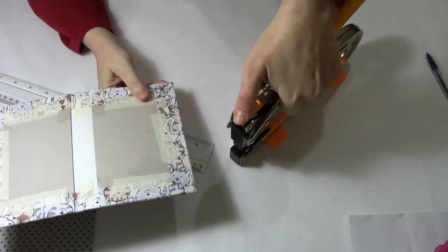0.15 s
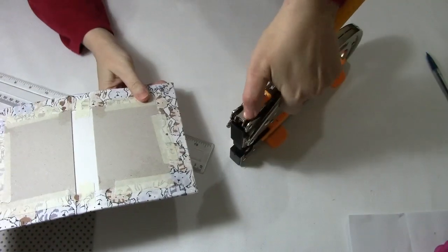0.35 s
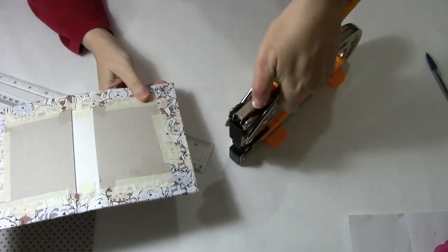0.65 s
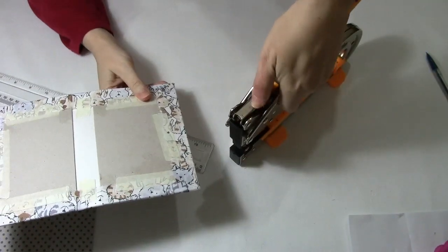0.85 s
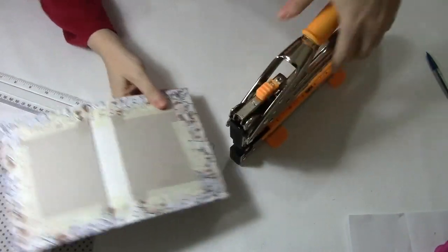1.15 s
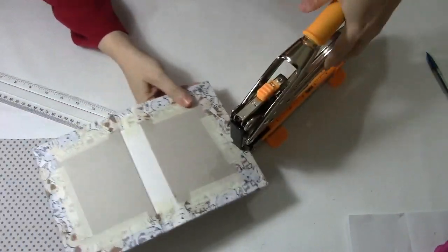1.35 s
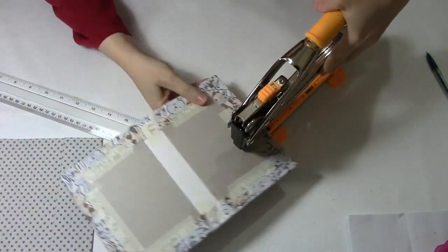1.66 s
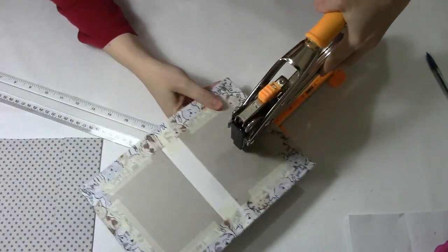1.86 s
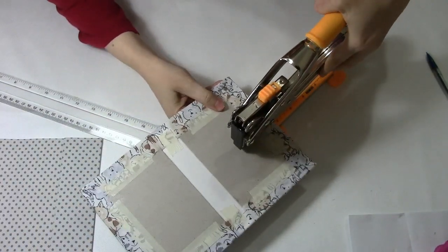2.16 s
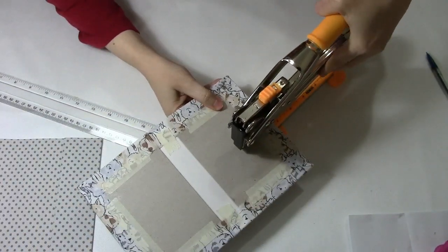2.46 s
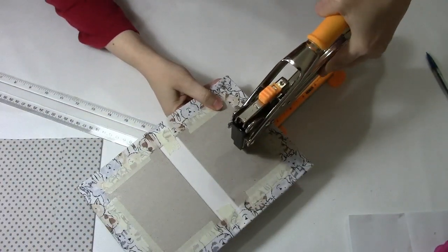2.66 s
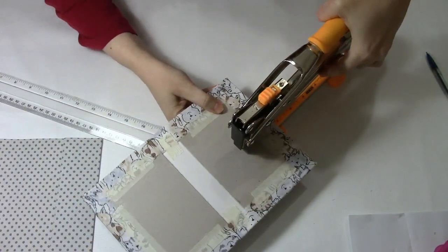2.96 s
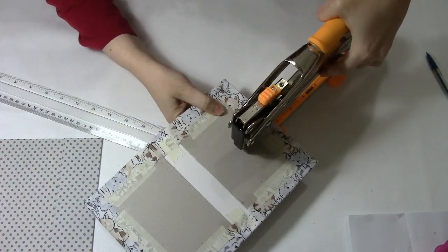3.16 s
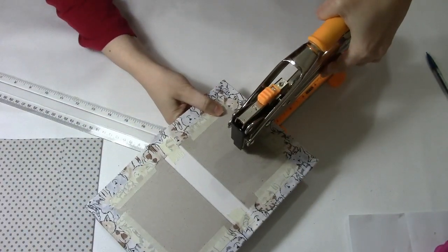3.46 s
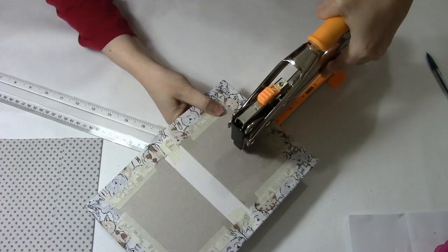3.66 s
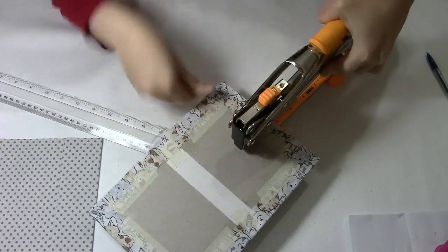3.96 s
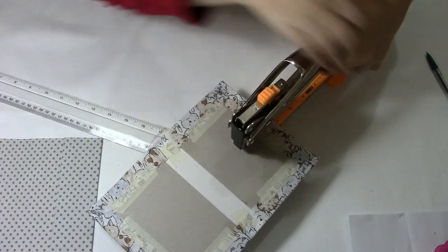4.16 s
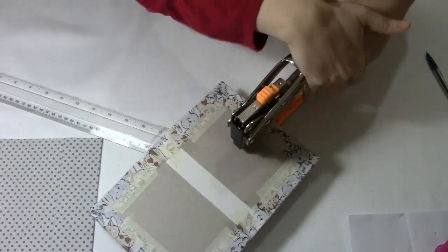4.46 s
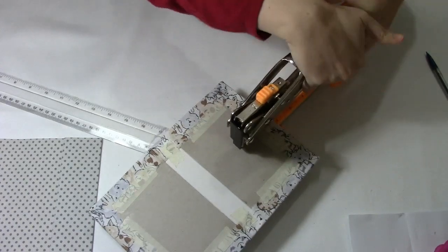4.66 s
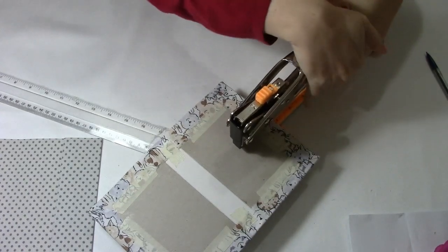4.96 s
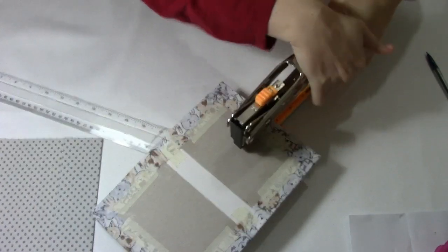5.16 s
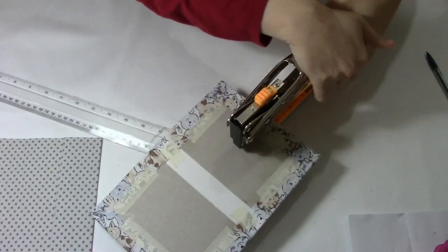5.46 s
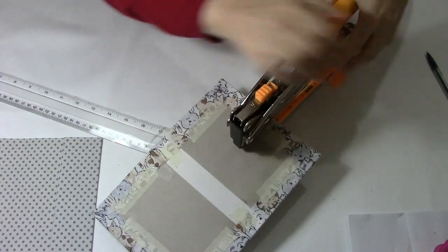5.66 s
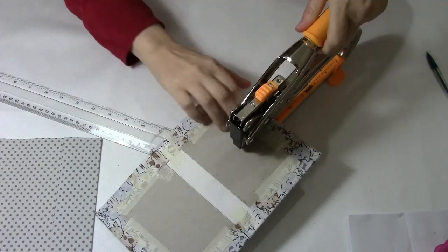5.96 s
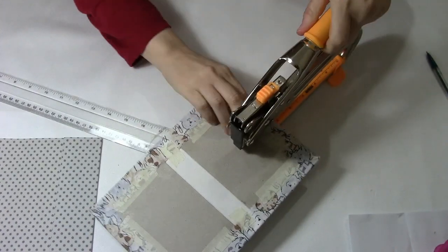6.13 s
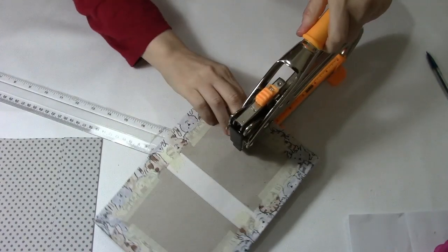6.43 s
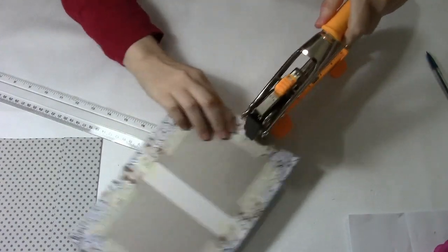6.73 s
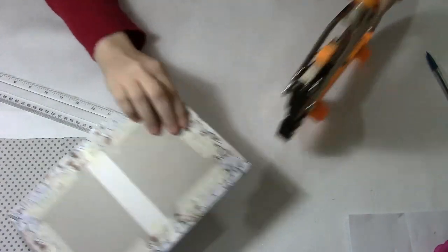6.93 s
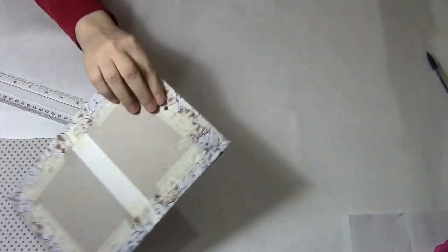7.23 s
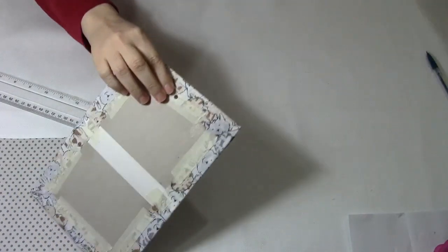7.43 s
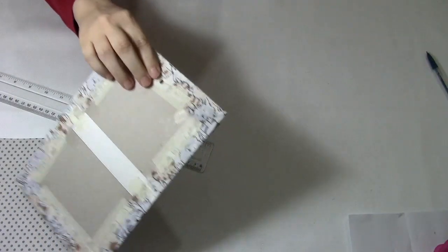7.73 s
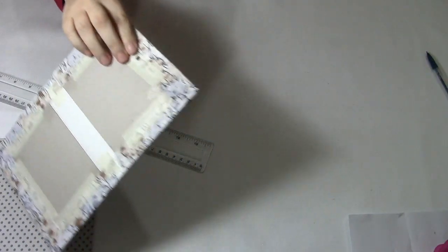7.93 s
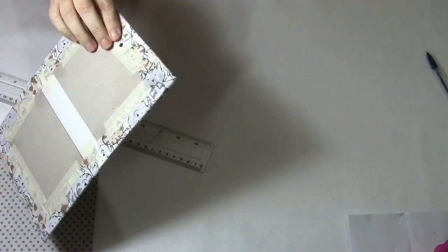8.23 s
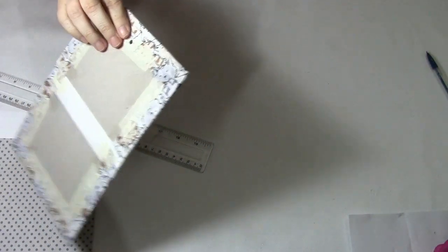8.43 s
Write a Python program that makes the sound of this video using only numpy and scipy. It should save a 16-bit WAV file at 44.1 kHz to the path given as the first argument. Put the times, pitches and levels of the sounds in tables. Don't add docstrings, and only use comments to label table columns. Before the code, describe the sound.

A steel lever punch clicks sharply on a hollow table, a cardboard cover knocks in, then a loud crack with bouncing thumps, squeaks and sliding.

```python
import sys
import numpy as np
from scipy import signal
from scipy.fft import rfft, irfft, next_fast_len
from scipy.io import wavfile
from scipy.ndimage import uniform_filter1d

SR = 44100
rng = np.random.default_rng(int(sys.argv[2]) if len(sys.argv) > 2 else 0)


def store_pcm(level_fs):
    pcm = np.round(np.clip(level_fs, -1, 1) * 32767).astype(np.int16)
    wavfile.write(sys.argv[1], SR, np.atleast_2d(pcm).T)


def voltage_ratio(decibels):
    exponent = np.asarray(decibels, float) / 20
    return 10 ** exponent


N = 378819

# f/Hz, density/dB per Hz
HISS = [(15, -33), (25, -3), (55, -12.5), (76, -9), (149, -8.5), (256, -11), (309, -11), (335, -11),
        (641, -14.5), (1100, -17), (1260, -15.5), (2550, -20), (16000, -34)]
HISS_DB = -57
# f/Hz, likeness/-1..1
LIKENESS = [(60, 1), (130, 0.19), (290, -0.28), (640, -0.18), (1410, 0.41), (3100, 0.64), (6820, 0.58),
            (15000, 0.51)]
# f/Hz, level/dB rms
HUM = [(49, -68), (149, -69.5)]
# f/Hz, t60/s
ROOM_T60 = [(250, 0.42), (800, 0.18), (3000, 0.38), (9000, 0.32), (16000, 0.075)]
ROOM_DB, ROOM_SIDE_DB, ROOM_DELAY_S, SIDE_CUT_HZ = -11, -13.5, 0.0021, 1500

# f/Hz, level/dB, t60/s
TABLE = [(41, -31, .3), (73.4, -26, 0.14), (108.7, -3, 0.23), (148.7, -4, .24), (178, 1, 0.037)]
# f/Hz, level/dB, t60/s
PANEL = [(211.8, -0.5, 0.14), (267, -3, 0.11), (335.4, -2, 0.086), (428, -1, .1), (500, -4, 0.1),
         (583.7, -12, .06)]
# f/Hz, level/dB, t60/s
LOADED_TABLE = [(45, -14, .3), (75, -18, .2), (108, 0.1, .22), (148, -1, .25), (178, -14, .05)]
# f/Hz, level/dB, t60/s
LOADED_PANEL = [(215, -8, .16), (265, -5, .1), (332, -2, .08), (437, 1, .09), (475, 1, .08), (580, -4, .06)]
# f/Hz, level/dB, t60/s
JAWS = [(2020, -12.5, 0.0098), (2140, -3.5, 0.015), (2520, 0, .014), (2720, 1, 0.0087), (3257, -0.5, .012),
        (3380, -4, 0.015), (3850, -6, 0.0095), (4550, -7, 0.007)]
# f/Hz, level/dB, t60/s
STEEL = [(5420, -3, .007), (5940, -2.5, .007), (7130, -1.5, 0.0077), (7574, -2, 0.0065),
         (8470, -1.5, 0.00666), (9050, -1.5, 0.0055), (10190, -7, 0.0065), (11800, -11, 0.0052),
         (12300, -13, .004), (13400, -16, .004)]
# f/Hz, level/dB, t60/s
SCRAPE = [(1650, -8, .005), (2280, -1, .006), (2750, 1.5, .007), (3360, -4, .007), (4200, -10, .005)]
# f/Hz, level/dB, t60/s
CLOTH = [(1400, -7, .004), (2000, -6, .003), (3400, -3, .002), (5200, -1, .0012), (7800, 2, .001),
         (11000, 1, .0008), (14000, -5, .0008)]
# f/Hz, level/dB, t60/s
CARD_FREE = [(740, -15.5, 0.01), (803, 3.5, 0.014), (823, -14, 0.099), (923, -11, 0.022)]
# f/Hz, level/dB, t60/s
CARD_HELD = [(894, 3, 0.012), (941, 5, 0.013), (1072, -1.5, 0.017), (1148, -4.5, 0.016), (1380, -8, 0.012),
             (1780, -7, 0.0049)]
# f/Hz, level/dB, t60/s
BREAK = [(807, -3, .024), (1040, 0.1, .024), (1120, -3, .018), (1220, -6, .018), (1700, -10, .012)]

# t/s, top level/dB
LEANING = [(0.0, -47), (0.2, -65.5), (0.57, -51), (0.86, -52), (1.41, -84), (2.1, -57.5), (2.6, -52.5),
           (3.68, -70), (4.02, -51.5), (4.5, -66.5), (5.17, -51), (5.53, -45), (6.3, -60), (6.4, -79),
           (7.68, -85), (8.59, -59.5)]
# t/s, level/dB
SWAY = [(0, -75), (.6, -75), (.95, -62), (1.15, -66), (1.3, -80), (2.6, -78), (2.9, -68), (3.1, -80),
        (5.3, -75), (5.45, -62), (5.9, -57), (6.35, -62), (6.5, -78), (8.59, -78)]
# t/s, top level/dB, panel over top/dB
THUDS = [(0.048, -48, -9), (0.149, -43, -19), (0.347, -40, -10.5), (0.385, -39.5, -11), (0.618, -25, -10.5),
         (0.645, -41, -20), (0.699, -33, -26), (1.389, -33, -8.5), (1.516, -55.5, 4), (2.36, -43, -8),
         (3.178, -32.5, -10.5), (3.854, -37.5, 1.5), (3.99, -52, -8.5), (4.043, -38, -4), (4.279, -37, -22),
         (4.297, -36.5, -23), (4.412, -36, -30.5), (4.457, -34, -15.5), (4.651, -35, 3),
         (4.983, -35.5, 3.5), (5.036, -22.5, -4.5), (5.059, -46, 18), (5.516, -31, -10.1),
         (5.59, -29.5, -11.5), (5.659, -31, -12), (5.87, -40, -12), (8.425, -40.5, -5.5), (8.472, -47.5, 6),
         (8.566, -14.5, -16)]
# t/s, jaws peak level/dB, bright steel over jaws/dB, contact length/ms
SELECTOR = [(0.1552, -39, -7.5, 8.4), (0.3164, -42, -6, 7.7), (0.3474, -30, -2.5, 8.5),
            (0.3814, -26, -1, 12), (0.3956, -24.5, -17, 7.1), (0.4212, -37.5, -5.5, 12),
            (0.4517, -45.5, -2.5, 7.1), (0.6135, -15, -0.5, 4), (0.6185, -11, 4, 6), (0.621, -13, 3, 4.5),
            (0.701, -29, -4, 4), (0.704, -29, -16, 6), (0.998, -50, 2.5, 10.1)]
# t/s, jaws peak level/dB, bright steel over jaws/dB, contact length/ms
LEVER = [(1.4117, -47, -15, 7.4), (1.887, -41, -14, 10), (3.4103, -57, -19, 6.4), (3.9927, -40.5, -3, 8),
         (4.014, -40, -3, 10), (4.027, -33.5, -6, 5.6), (4.3182, -54.5, 3.5, 6.4), (4.7, -51, -11, 7.9),
         (4.7244, -49.5, -1.1, 5), (4.8354, -46, 1, 7.9), (5.0913, -33, -14, 6), (5.2155, -20, 8, 2.5),
         (5.2375, -19, -3, 4), (5.243, -22, -8, 8), (5.264, -26, -10, 6), (5.2855, -23, -8, 6),
         (5.293, -24, -10, 6), (5.057, -30, -9, 5), (5.07, -35, -5, 5), (5.3018, -24, -8, 6),
         (5.5164, -35, 1, 8.1), (5.525, -24, -8, 1.7), (5.766, -57, 10, 5), (7.0806, -47, -14, 5.7),
         (7.0945, -38.5, -5.5, 5.6), (7.567, -47.5, -15, 5.5), (7.7245, -43.5, -14, 7),
         (7.8276, -43.5, 0, 3.3), (8.1693, -45, 0, 5.9), (8.426, -50.5, 4.5, 6.5), (8.5644, -40.5, -9, 22)]
SELECTOR_IN_CARD_DB, LEVER_IN_CARD_DB = -27, -9
# t/s, cardboard peak level/dB, jaws over cardboard/dB, bright steel over jaws/dB
COVER_KNOCKS = [(1.0544, -49, -6, -11), (1.3833, -12, -12.5, -1), (1.4602, -59, 0.5, -8),
                (1.5156, -21.5, -24, -7), (1.5476, -50, 4, -9), (1.8993, -44, -3, -13),
                (2.2992, -62.5, 2, -7), (3.1761, -34.5, -5.5, -24), (3.849, -37, -28, -6),
                (4.1989, -52, -5.5, -13), (4.414, -49.5, -13, 14), (4.5746, -52, -8, 5),
                (4.6513, -47, -3.5, 1.5), (4.7462, -48, -0.5, -21), (4.9829, -36, -8, -14),
                (5.035, -20, -9.5, -7), (5.048, -24, -9, 0.1), (5.2062, -16, 3, -6),
                (5.2175, -28, -20, -10), (5.5917, -23.5, -6.5, -7), (5.7316, -33, -6, -12),
                (5.8745, -29, -9.5, 1), (5.9933, -46, -8, 8), (6.1763, -35, -2, -3),
                (6.2516, -46.5, -5, -13), (6.335, -49, -9, -13), (6.3845, -46.5, -1, -17),
                (7.3912, -43.5, -2.5, -3.5), (8.4714, -43, -9.5, -14), (8.4992, -48, -6, -8)]
COVER_KNOCK_MS = 7.2
# t/s, grip/0-1
GRIP = [(0, 0), (2.5, 0), (3.9, .2), (3.99, .8), (5.25, .9), (5.55, .3), (5.9, .2), (6.0, .8), (6.2, .5),
        (6.5, .5), (6.85, 0), (7.1, .8), (8.59, .7)]

# start t/s, peak t/s, end t/s, level/dB, cardboard over level/dB
RATTLES = [
    (0.385, 0.4, 0.52, -46, -25),
    (0.622, 0.635, 0.83, -29, -27.5),
]
# start t/s, peak t/s, end t/s, level/dB, cardboard over level/dB
PRESSES = [
    (0.64, 0.66, 1.02, -45, -8),
    (3.85, 3.856, 3.99, -34.5, -10.1),
    (4.03, 4.05, 4.1, -42.5, -11),
    (4.652, 4.658, 5, -41, -18),
    (4.975, 5.045, 5.12, -33, -3.5),
    (5.22, 5.228, 5.42, -25, -14),
    (5.49, 5.51, 5.74, -46, -7),
    (5.84, 5.874, 6, -51, -2),
]
# start t/s, peak t/s, end t/s, level/dB, cardboard over level/dB
BRUSHES = [(0.94, 1.004, 1.1, -59, -7), (3.92, 3.96, 4.0, -59, 1), (4.27, 4.29, 4.32, -60, -8),
           (4.35, 4.46, 4.5, -54, -8), (3.99, 4.025, 4.045, -47, -9), (3.848, 3.855, 3.93, -64, 12),
           (4.965, 4.99, 5.04, -57, 8), (4.65, 4.68, 4.8, -55.5, -2), (5.03, 5.052, 5.1, -46, -3),
           (5.508, 5.522, 5.7, -44.5, 6), (7.84, 7.94, 8.03, -48.5, -10), (8.01, 8.065, 8.21, -49.5, -6.5),
           (8.465, 8.48, 8.54, -55.5, 12.5)]
# start t/s, peak t/s, end t/s, level/dB, cardboard over level/dB
SLIDES = [(1.64, 1.85, 2.025, -46.5, -5), (2.2, 2.3, 2.32, -56.5, -3), (3.988, 3.995, 4.035, -37, 5),
          (3.995, 4.028, 4.042, -39, -2), (5.5, 5.62, 5.36, -49, 2), (5.846, 5.878, 5.905, -41.5, 5),
          (5.992, 6.095, 6.15, -40.5, -1), (6.22, 6.312, 6.36, -50, -9), (6.485, 6.68, 6.9, -45, -6),
          (6.76, 6.85, 6.9, -60, 10), (6.49, 6.52, 6.6, -58, 8), (7.36, 7.388, 7.9, -64, 3.5)]
# start t/s, peak t/s, end t/s, level/dB, cardboard over level/dB
SHEARS = [
    (5.15, 5.19, 5.4, -58.5, 11.5),
    (5.22, 5.23, 5.34, -26, -4),
    (5.25, 5.3, 5.414, -28, 1),
]
# (start, end below peak/dB)
RATTLE_RULE = (-3, 0.1, -27), (6.7, 36)
# (start, end below peak/dB)
PRESS_RULE = (-29, -30.5, 0.1), (14.4, 17.7)
# (start, end below peak/dB)
BRUSH_RULE = (-9, 3, -7.5), (9.2, 15)
# (start, end below peak/dB)
SLIDE_RULE = (0.16, -6.5, -23), (10.1, 16)
# (start, end below peak/dB)
SHEAR_RULE = (0.1, -10, -27), (6.7, 38)
LONGEST_FADE_S = .26
CARD_FOLLOWS = 0.65

# start t/s, attack/s, length/s, peak level to which each tone's own is added/dB,
# fall/dB
SQUEAKS = [(3.675, .04, 0.098, -56, 1), (4.813, 0.036, 0.048, -50.5, 21), (5.041, .006, 0.062, -48, 8),
           (5.069, 0.008, 0.04, -41, 4), (5.509, 0.009, 0.018, -26, 18), (5.552, .02, 0.036, -34, 13),
           (5.653, .008, 0.055, -34, 20), (5.853, 0.015, .095, -37, 31), (5.525, .008, .055, -42, 10),
           (5.536, .012, .075, -48, 8), (5.511, .004, .012, -38, 10), (4.998, .01, .04, -56, 6),
           (1.003, .01, .03, -58, 6), (1.034, .012, .03, -60, 6)]
# first f/Hz, settled f/Hz, wobble share
SLIPS = [(5200, 5140, .003), (1640, 1635, .003), (5600, 5570, .003), (4600, 4620, .003), (5150, 4980, .008),
         (7500, 7050, .035), (1680, 1500, .012), (7420, 7380, .004), (5050, 5020, .008), (7480, 7450, .004),
         (5850, 5750, .01), (1080, 1080, .01), (4400, 4400, .006), (8650, 8650, .003)]
TONES_DB = [
    [-4],
    [-2, -23, -2, -14],
    [2],
    [4],
    [1.5, -20],
    [-2, -11],
    [-3, 1, -12, -11, -13, -18, -22, -21, -19],
    [-12],
    [0.1],
    [0.1],
    [0.1],
    [0.1],
    [0.1],
    [0.1],
]
SETTLE_S, SQUEAK_ONSET_DB = .016, 15

# t/s, top level/dB, panel over top/dB
BOUNCES = [
    (5.206, -6, -6),
    (5.216, -4, -1),
    (5.223, -12, -2),
    (5.24, -10, -7),
    (5.263, -11, -8),
    (5.29, -15, -6),
]
BREAK_S, BREAK_DB = 5.206, -2.5
# start t/s, end t/s
DROPOUT_S = (2.7135, 2.7475)
BASS_CUT_HZ, TOP_CUT_HZ = 28, 15450
OFFSET = 0.011


def rms_one(x):
    return x / np.sqrt(np.mean(x ** 2) + 1e-20)


def at_hz(points, hz):
    f, value = np.transpose(points)
    return np.interp(np.log(hz), np.log(f), value)


def in_time(rows):
    s, *columns = np.transpose(rows)
    return [np.interp(np.arange(N) / SR, s, c) for c in columns]


def bandpass(order, low, high):
    return signal.butter(order, [low, min(high, .45 * SR)], "band", fs=SR, output="sos")


def drift(rate, size, step=1):
    r = np.exp(-2 * np.pi * rate * step / SR)
    noise = rng.standard_normal(size // step + 4001)
    slow = signal.lfilter([1], [1, -2 * r, r * r], noise)[4000:]
    return np.interp(np.arange(size) / step, np.arange(len(slow)), rms_one(slow))


def ringing(modes, damp=1):
    hz, db, t60 = np.transpose(modes)[:, :, None]
    t = np.arange(round(SR * t60.max()) + 2048) / SR
    phase = (-1.) ** np.arange(len(modes))[:, None]
    rings = voltage_ratio(db - 60 * t / (t60 * damp)) * np.sin(2 * np.pi * hz * t) * phase
    return signal.sosfilt(bandpass(3, hz.min() * .85, hz.max() * 1.15), rings)


def even(force):
    spectrum = rfft(force)
    smooth_power = uniform_filter1d(np.abs(spectrum) ** 2, size=15)
    return irfft(spectrum / np.sqrt(smooth_power + 1e-12), len(force))


def knocks(modes, times, peaks_db, lengths_ms, scatter_db, crack, rise, push=0):
    out, rings, t = np.zeros(N + 2 * SR), ringing(modes), np.arange(2048) / SR
    snap = signal.sosfilt(bandpass(3, modes[0][0] * .85, modes[-1][0] * 1.1), t == 0)
    snap = snap / np.abs(snap).max()
    for s, peak_db, ms in np.broadcast(times, peaks_db, lengths_ms):
        age = t / np.clip(ms / 1000, .001, .04)
        force = (push + rng.standard_normal(len(t))) * age ** rise * np.exp(-3 * age)
        if not push:
            force = even(force) * (age < 2.5)
        body = voltage_ratio(scatter_db * rng.standard_normal(len(modes))) @ rings
        body[:len(t)] += crack * snap * np.abs(body).max()
        hit = signal.fftconvolve(force, body)
        at = round(s * SR)
        out[at:at + len(hit)] += voltage_ratio(peak_db) * hit / np.abs(hit).max()
    return out[:N]


def friction(modes, level_db, damp, grain_db, patchy_db):
    unevenness_db = grain_db * drift(150, N, step=16) + patchy_db * drift(7.4, N, step=16)
    grains = rng.standard_normal(N) * voltage_ratio(unevenness_db)
    body = ringing(modes, damp).sum(axis=0)
    return voltage_ratio(level_db) * rms_one(signal.fftconvolve(grains, body)[:N])


def background():
    size = next_fast_len(N + 1, real=True)
    hz = np.maximum(np.fft.rfftfreq(size, 1 / SR), 1)
    alike = np.clip(at_hz(LIKENESS, hz), -.95, .95)
    mid, side = rfft(rng.standard_normal((2, size))) * voltage_ratio(at_hz(HISS, hz))
    mid = irfft(mid, size)[:N]
    side = irfft(side * np.sqrt((1 - alike) / (1 + alike)), size)[:N]
    noise = voltage_ratio(HISS_DB) * (mid + side * [[1], [-1]]) / np.std(mid)
    t = np.arange(N) / SR
    for f, db in HUM:
        level = voltage_ratio(db + 0.83 * drift(2.3, N, step=16))
        noise = noise + level * np.sqrt(2) * np.sin(2 * np.pi * f * t)
    return noise


def leaning():
    hands = friction(TABLE[2:4], in_time(LEANING)[0] - 1.5, damp=1.9, grain_db=5.0, patchy_db=3.5)
    frame = friction(TABLE[:2], in_time(SWAY)[0], damp=1.0, grain_db=0, patchy_db=2.0)
    return hands + frame


def room(x):
    t, tail, edges = np.arange(SR // 2) / SR, 0, 170 * 2 ** np.arange(0, 7.1)
    for low, high in zip(edges, edges[1:]):
        decay = voltage_ratio(-60 * t / at_hz(ROOM_T60, np.sqrt(low * high)))
        tail = tail + decay * signal.sosfilt(bandpass(2, low, high), rng.standard_normal((2, len(t))))
    tail = tail * np.clip(t / ROOM_DELAY_S - 1, 0, 1)
    tail = tail / np.sqrt(np.sum(tail[0] ** 2))
    mid, side = signal.fftconvolve(x[None], tail, axes=1)[:, :N]
    side = signal.sosfilt(signal.butter(1, SIDE_CUT_HZ, "high", fs=SR, output="sos"), side)
    return voltage_ratio(ROOM_DB) * (mid + voltage_ratio(ROOM_SIDE_DB) * side * [[1], [-1]])


def table_thuds():
    s, top_db, panel_db = np.transpose(THUDS)
    top = knocks(TABLE, s, top_db - 3, 2, scatter_db=2, crack=.8, rise=1, push=2)
    panel = knocks(PANEL, s, top_db + panel_db + 4, 2, scatter_db=2, crack=.4, rise=1, push=2)
    return top + panel


def contacts():
    rows = []
    for table, share_db in ((SELECTOR, SELECTOR_IN_CARD_DB), (LEVER, LEVER_IN_CARD_DB)):
        rows += [(s, db, db + share_db, db + bright, ms) for s, db, bright, ms in table]
    rows += [(s, db + jaws, db, db + jaws + bright, COVER_KNOCK_MS) for s, db, jaws, bright in COVER_KNOCKS]
    return np.transpose(rows)


def steel_clicks(s, jaws_db, steel_db, ms):
    jaws = knocks(JAWS, s, jaws_db + 3, ms, scatter_db=2, crack=2.5, rise=1)
    bright = knocks(STEEL, s, steel_db + 3, ms, scatter_db=2, crack=3, rise=1)
    return jaws + bright


def strokes():
    power, t = np.full((4, N), 1e-9), np.arange(N) / SR
    kinds = ((SLIDES, SLIDE_RULE), (BRUSHES, BRUSH_RULE), (PRESSES, PRESS_RULE), (SHEARS, SHEAR_RULE),
             (RATTLES, RATTLE_RULE))
    for rows, (mix_db, (rise, fall)) in kinds:
        for start, peak, end, db, card_db in rows:
            end = min(end, peak + LONGEST_FADE_S)
            at = slice(round(start * SR), round(end * SR))
            swell = np.interp(t[at], [start, peak, end], [-rise, 0, -fall])
            edge = np.clip(np.minimum(t[at] - start, end - t[at]) / .004, 0, 1)
            levels = db + np.array([card_db + CARD_FOLLOWS * swell, *(m + swell for m in mix_db)])
            power[:, at] += (edge * voltage_ratio(levels)) ** 2
    return 10 * np.log10(power)


def rubs(jaws_db, cloth_db, panel_db):
    scrape = friction(SCRAPE, jaws_db - 1.5, damp=1, grain_db=3, patchy_db=1.1)
    rustle = friction(CLOTH, cloth_db - 1.5, damp=1, grain_db=3, patchy_db=1.5)
    grind = friction(PANEL, panel_db - 3, damp=.4, grain_db=1.5, patchy_db=1.5)
    return scrape + rustle + grind


def cover(s, peaks_db, ms, rub_db):
    grip = np.clip(in_time(GRIP)[0], 0, 1)
    out = 0
    for modes, share in ((CARD_FREE, 1 - grip), (CARD_HELD, grip)):
        knocking = knocks(modes, s, peaks_db, ms, scatter_db=1.5, crack=.15, rise=1, push=1)
        rubbing = friction(modes, rub_db, damp=.7, grain_db=2.5, patchy_db=1.5)
        out = out + np.sqrt(share) * (knocking + rubbing)
    return out


def squeak(rows, slips, tones_db, flicker_db):
    s, db = np.transpose(rows)
    first_hz, settled_hz, wobble = slips
    at = np.arange(round(s[0] * SR), round(s[-1] * SR))
    hz = settled_hz + (first_hz - settled_hz) * np.exp(-(at - at[0]) / SR / SETTLE_S)
    turns = np.cumsum(hz * (1 + wobble * drift(137, len(at)))) / SR
    fade = np.minimum(1, np.minimum(at - at[0], at[-1] - at) / 150)
    tone = 0
    for multiple, tone_db in enumerate(tones_db, 1):
        level = voltage_ratio(tone_db + flicker_db * drift(90, len(at)))
        tone = tone + level * np.sin(2 * np.pi * multiple * turns)
    return at, np.sqrt(2) * fade * voltage_ratio(np.interp(at / SR, s, db)) * tone


def pivot():
    out = np.zeros(N)
    for (s, attack, length, db, fall), slips, tones_db in zip(SQUEAKS, SLIPS, TONES_DB):
        end = s + max(length, attack + .005)
        rows = [(s, db - SQUEAK_ONSET_DB), (s + attack, db), (end, db - fall)]
        at, tone = squeak(rows, slips, tones_db, flicker_db=4.0)
        out[at] += tone
    return out


def die_breakthrough():
    s, top_db, panel_db = np.transpose(BOUNCES)
    top = knocks(LOADED_TABLE, s, top_db - 3, 2, scatter_db=1, crack=.5, rise=1, push=3)
    panel = knocks(LOADED_PANEL, s, top_db + panel_db, 1.5, scatter_db=1, crack=.3, rise=1, push=3)
    board = knocks(BREAK, BREAK_S, BREAK_DB, 1, scatter_db=0, crack=.1, rise=1, push=3)
    return top + panel + board


def scene():
    s, jaws_db, card_db, steel_db, ms = contacts()
    card_rub_db, jaws_rub_db, cloth_rub_db, panel_rub_db = strokes()
    near = leaning() + table_thuds()
    near += steel_clicks(s, jaws_db, steel_db, ms)
    near += rubs(jaws_rub_db, cloth_rub_db, panel_rub_db)
    near += cover(s, card_db + 3, ms / 5, card_rub_db - 1.5)
    near += pivot() + die_breakthrough()
    return near + room(near) + background()


def band_limit(x):
    return signal.sosfilt(signal.butter(12, 16890, fs=SR, output="sos"), x)


def record(dry):
    t = np.arange(N) / SR
    present = (t < DROPOUT_S[0]) | (t > DROPOUT_S[1])
    on = uniform_filter1d(1. * present, size=36)
    rounded = 1.8 * np.tanh(dry / 1.8)
    x = (rounded + OFFSET) * on - OFFSET
    x = signal.sosfilt(signal.butter(3, BASS_CUT_HZ, "high", fs=SR, output="sos"), x)
    x = signal.sosfilt(signal.cheby1(8, 1, TOP_CUT_HZ, fs=SR, output="sos"), x)
    return band_limit(x)


dry = scene()
out = record(dry)
store_pcm(out)
```